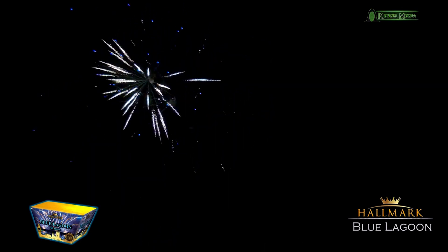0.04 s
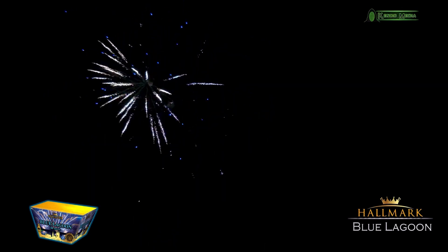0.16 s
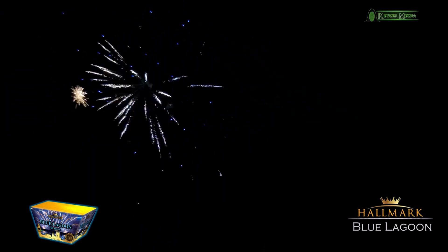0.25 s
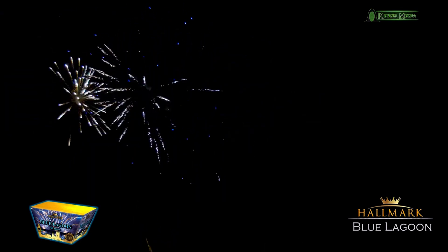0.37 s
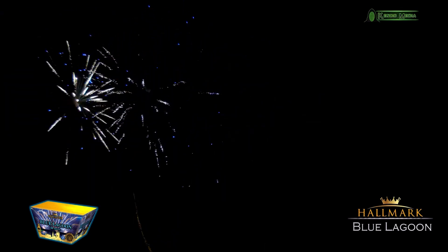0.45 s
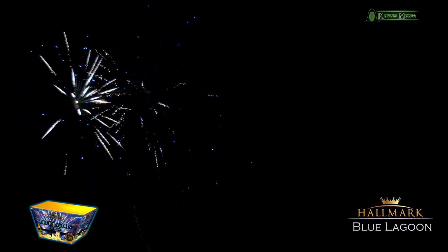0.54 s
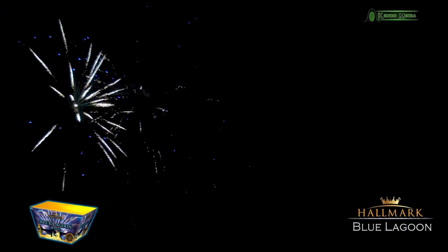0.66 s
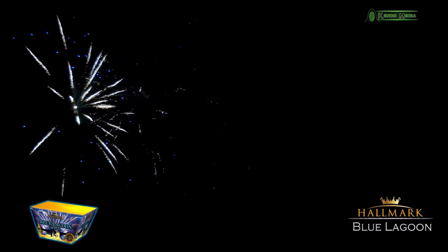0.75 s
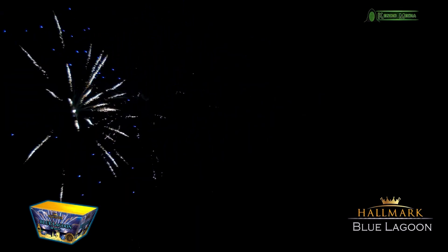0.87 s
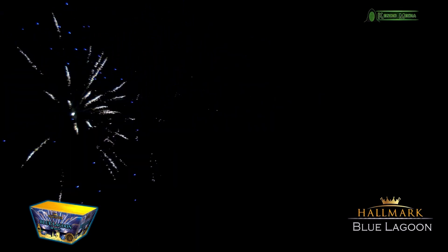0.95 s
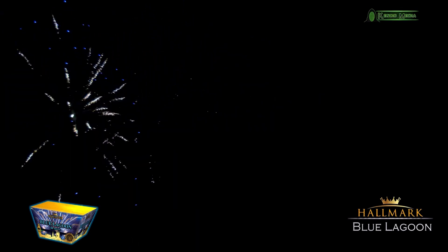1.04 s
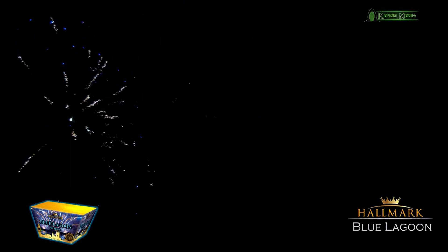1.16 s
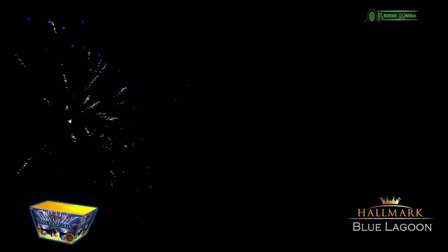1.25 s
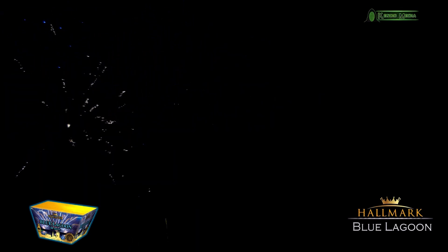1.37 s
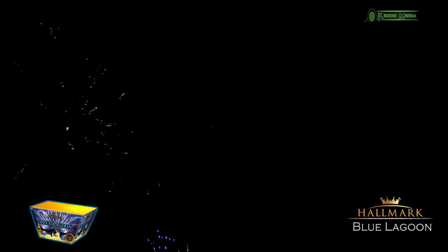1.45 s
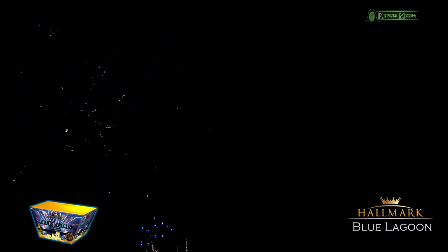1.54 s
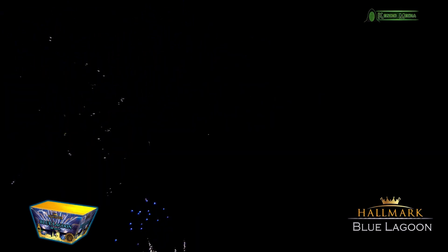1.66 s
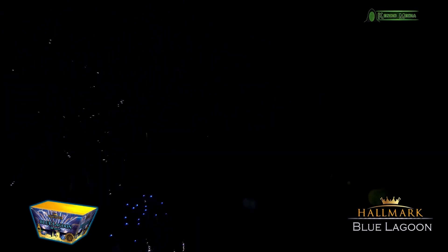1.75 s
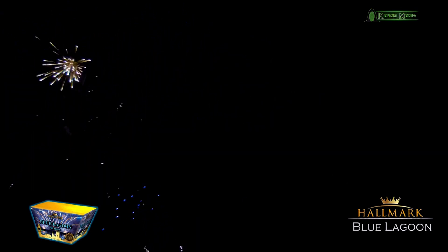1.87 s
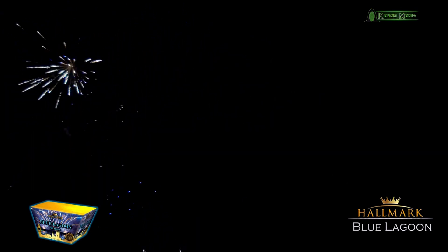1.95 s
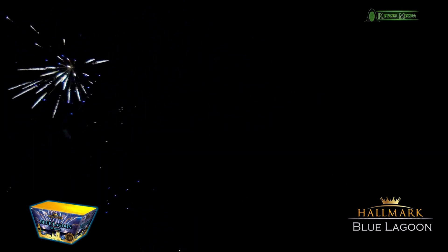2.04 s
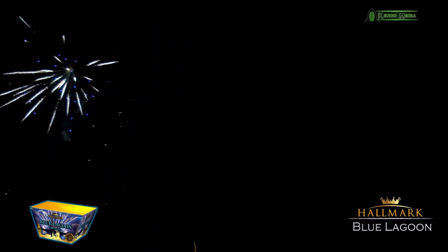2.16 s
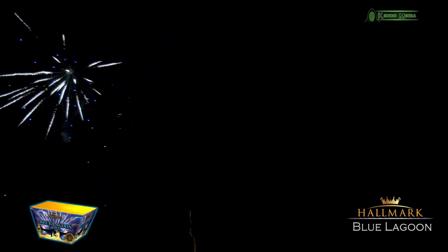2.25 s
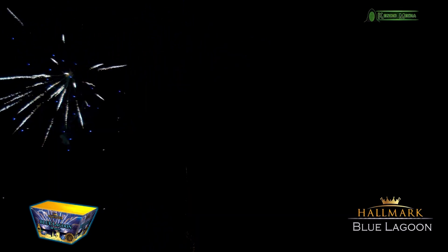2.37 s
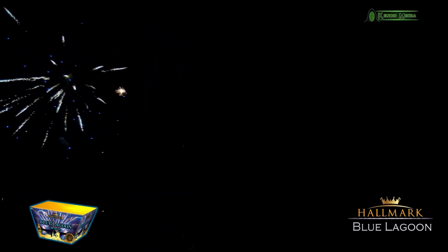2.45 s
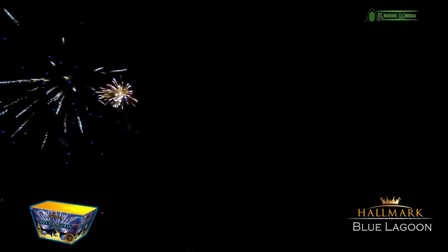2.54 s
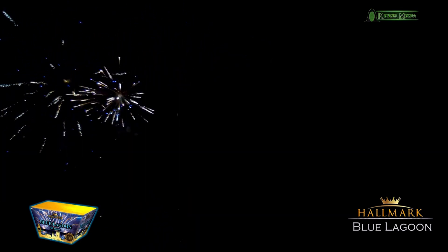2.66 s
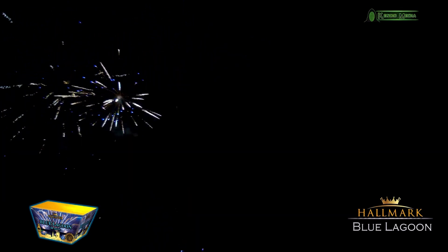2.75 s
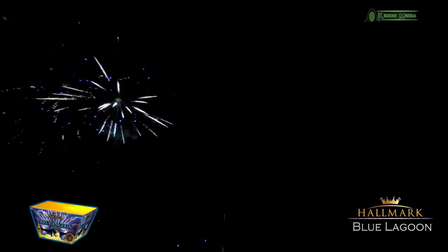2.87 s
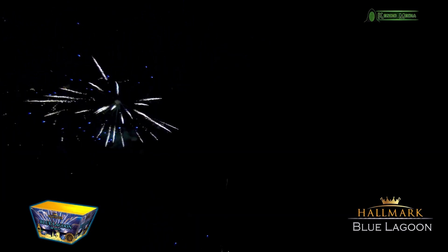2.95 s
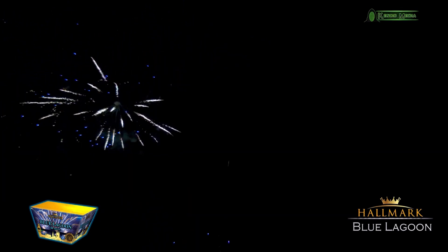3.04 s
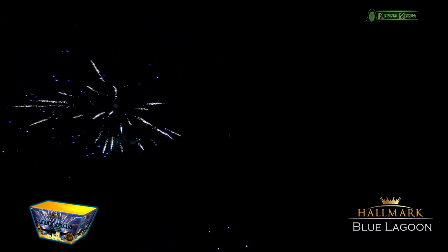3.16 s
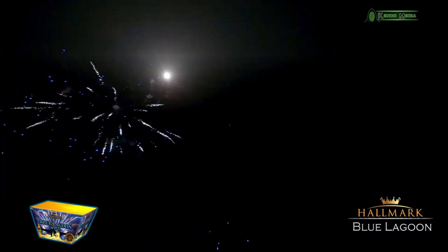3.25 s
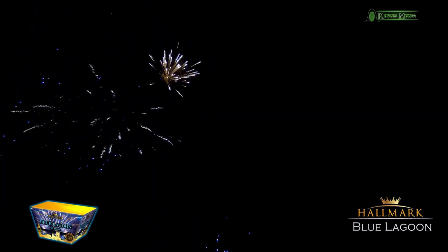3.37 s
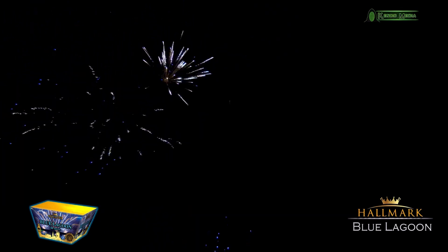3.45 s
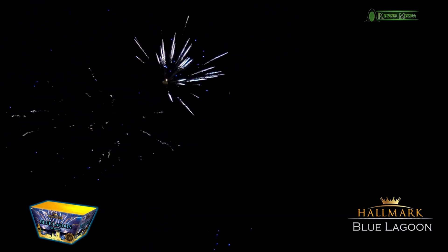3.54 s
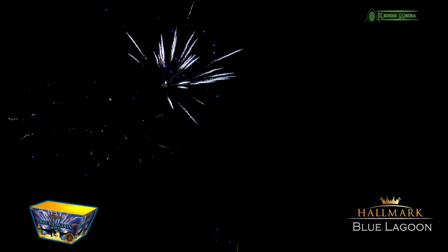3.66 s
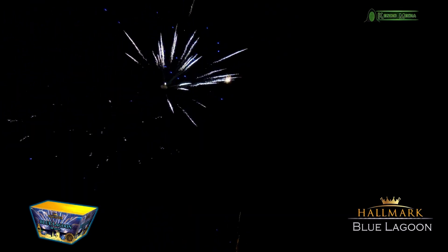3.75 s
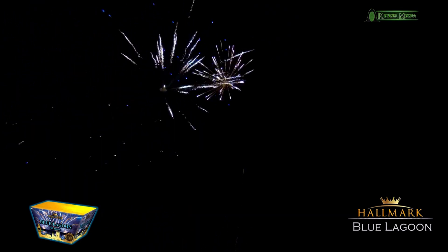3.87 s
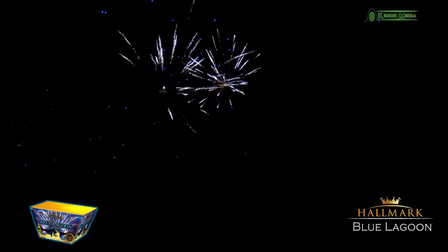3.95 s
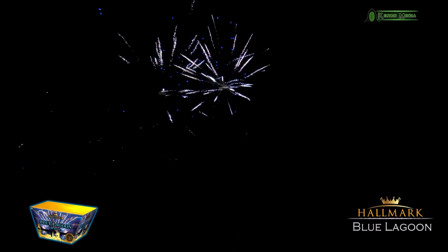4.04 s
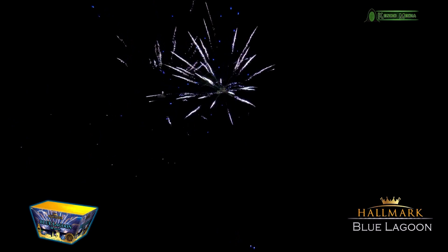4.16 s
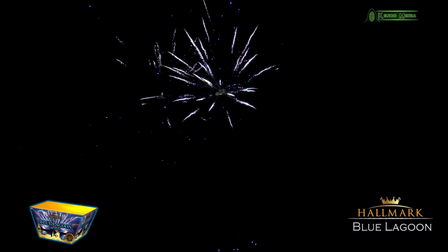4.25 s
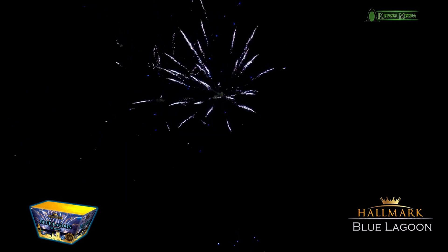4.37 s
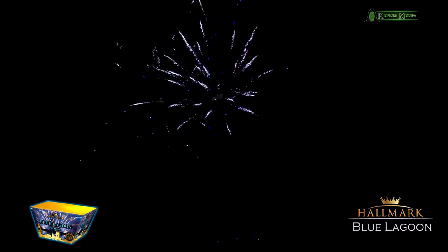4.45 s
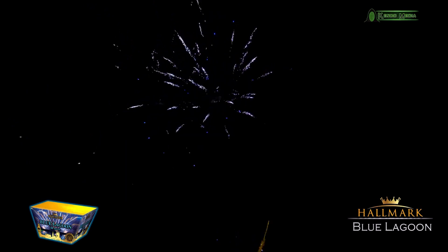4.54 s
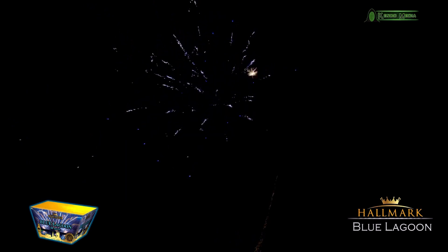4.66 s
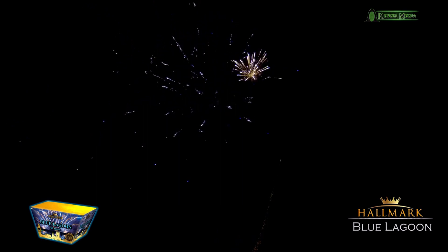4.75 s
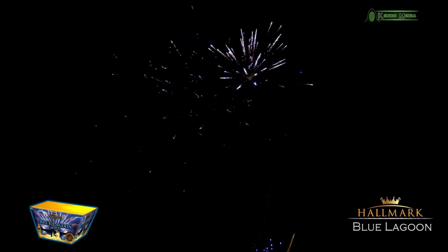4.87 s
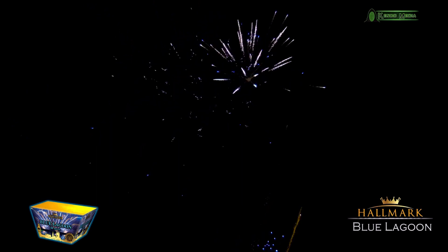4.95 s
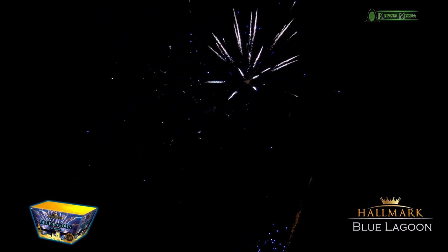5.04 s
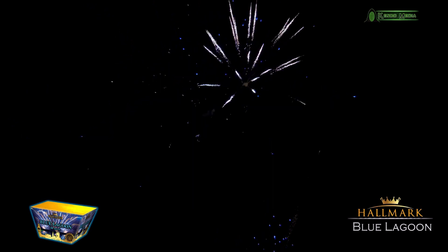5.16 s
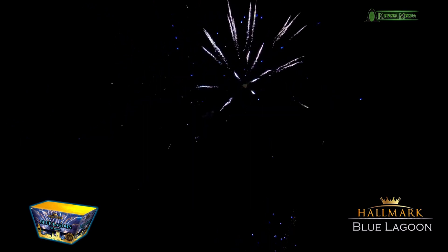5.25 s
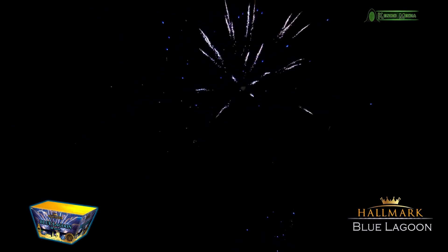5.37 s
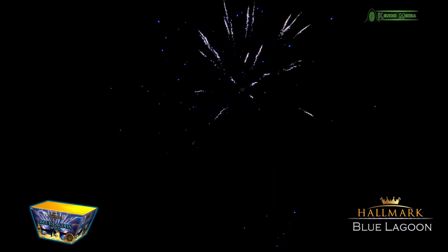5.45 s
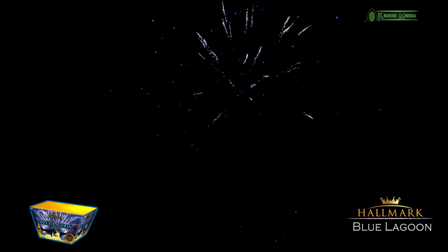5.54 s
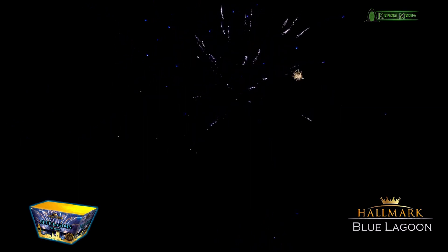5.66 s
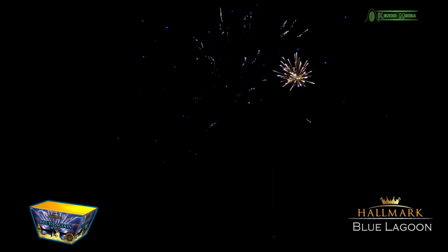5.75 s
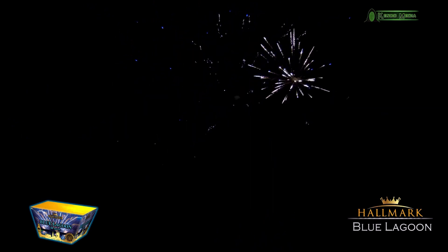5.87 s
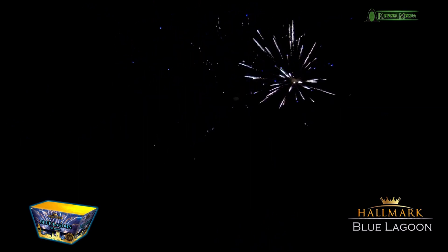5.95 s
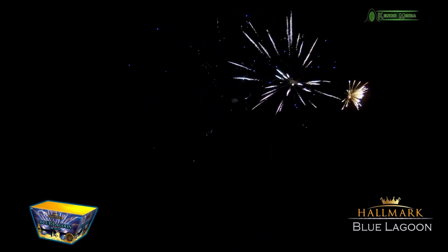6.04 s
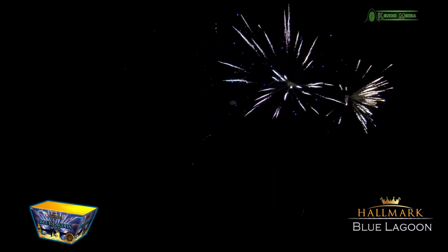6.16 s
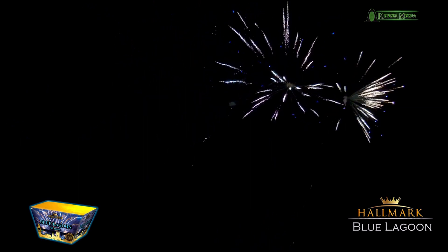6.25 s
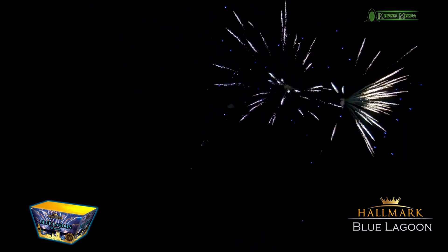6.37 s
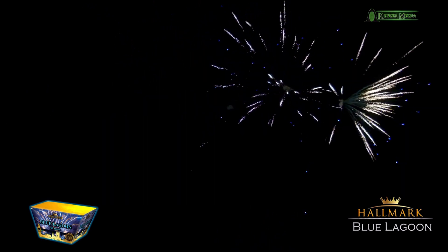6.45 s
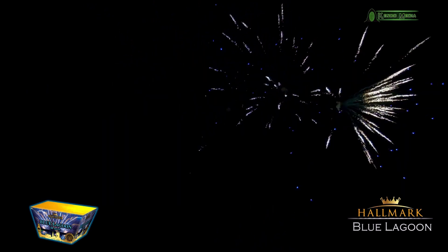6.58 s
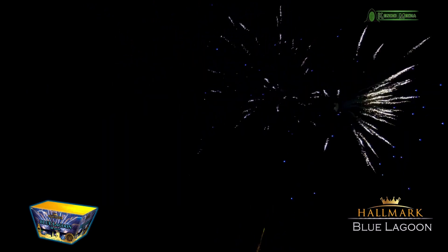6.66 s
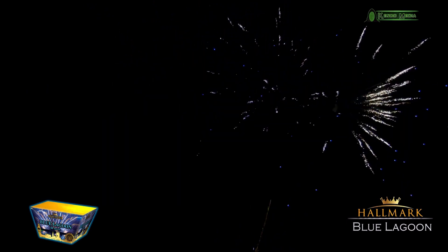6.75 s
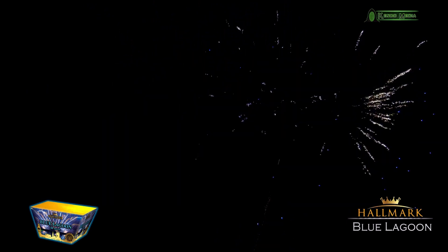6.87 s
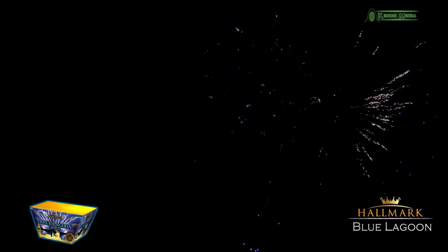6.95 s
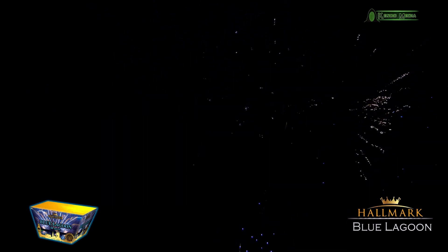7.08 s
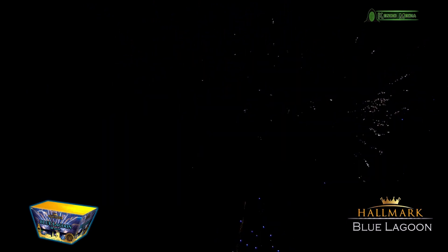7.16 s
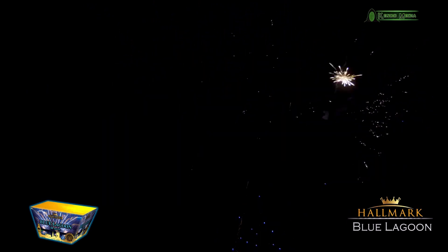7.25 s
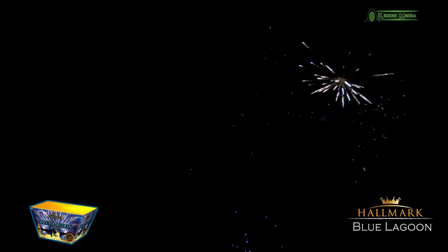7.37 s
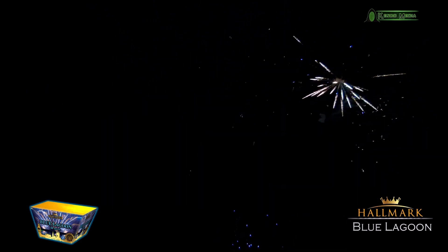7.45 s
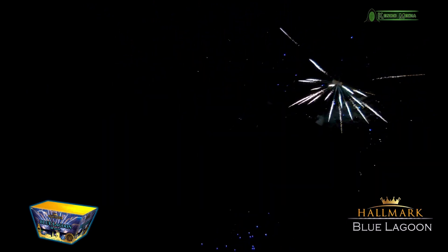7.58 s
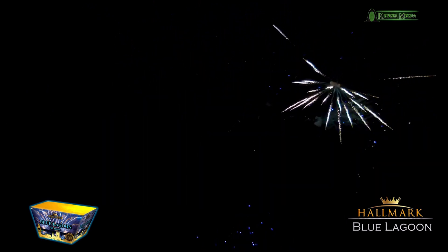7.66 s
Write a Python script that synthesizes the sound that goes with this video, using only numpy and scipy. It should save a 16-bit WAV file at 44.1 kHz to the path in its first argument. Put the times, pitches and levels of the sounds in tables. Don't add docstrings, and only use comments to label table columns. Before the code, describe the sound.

Rows of three firework shells burst in sharp, overloaded cracks outdoors, with dull launch thumps between them, short echoes and faint wind rumble.

```python
import sys
import numpy as np
from scipy import signal
from scipy.fft import rfft, irfft, next_fast_len
from scipy.io import wavfile
from scipy.ndimage import map_coordinates

SR = 44100
rng = np.random.default_rng(int(sys.argv[2]) if len(sys.argv) > 2 else 0)


def unload_wav(signal):
    wavfile.write(
        sys.argv[1],
        SR,
        np.round(np.clip(np.atleast_2d(signal).T, -1, 1) * 32767).astype(np.int16),
    )


def voltage_ratio(level):
    return 10 ** (np.asarray(level, float) / 20)


N = 340011
LEAD = SR // 4


def unit(x):
    return x / np.sqrt(np.mean(x ** 2) + 1e-20)


def add(track, s, sound):
    i = LEAD + round(s * SR)
    track[:, i:i + sound.shape[1]] += sound


def pan(db):
    return voltage_ratio([[db / 2], [-db / 2]])


def wobble(n, rate):
    return map_coordinates(rng.standard_normal(n // 40), [np.arange(n) * rate / SR])


def noise(n, spectrum, alike, lo_hz=0, hi_hz=SR):
    m = next_fast_len(n)
    hz = np.fft.rfftfreq(m, 1 / SR) + 1
    f, db = np.transpose(spectrum)
    gain = voltage_ratio(np.interp(np.log(hz), np.log(f), db))
    gain = gain / (1 + (lo_hz / hz) ** 4) / (1 + (hz / hi_hz) ** 4)
    mid, side = irfft(rfft(rng.standard_normal((2, m))) * gain, m)[:, :n]
    turn = np.arccos(np.clip(alike, -1, 1)) / 2
    return unit(np.cos(turn) * mid + np.sin(turn) * np.array([side, -side]))


def lowpass(x, hz):
    return signal.lfilter(*signal.butter(2, min(hz, 20000) / (SR / 2)), x)


def blast(push_ms, stretch, fade_ms, drive_db, rebound, settle_ms):
    ms = np.arange(SR // 50) / SR * 1000
    swing = np.cos(np.pi / 2 * (ms / push_ms) ** stretch) * np.exp(-ms / fade_ms)
    wave = np.tanh(voltage_ratio(drive_db) * swing)
    after = ms - push_ms * 3 ** (1 / stretch)
    settling = rebound * np.tanh(after / 0.32) * np.exp(-np.abs(after) / settle_ms)
    return np.where(after < 0, wave, settling)


def field(rows, air, alike, middle_db, near_middle_db, top_db, top_loss_db, count):
    t = np.arange(int(.85 * SR)) / SR
    s, db, rise, t60, treble_db = np.transpose(rows)[:, :, None]
    course_db = db - np.where(t < s, 20 * (s - t) / rise, 60 * (t - s) / t60)

    def total(share):
        return np.sqrt(np.sum(voltage_ratio(course_db + share * treble_db) ** 2, axis=0))

    shapes = [total(0),
              total(0.11) * voltage_ratio(middle_db + near_middle_db * np.exp(-t / .012)),
              total(0.84),
              total(0.93) * voltage_ratio(-top_loss_db * t),
              total(0.88) * voltage_ratio(top_db - 2.6 * top_loss_db * t)]
    bands = [(0, 450), (450, 1400), (1400, 4200), (4200, 9500), (9500, SR)]
    stock = []
    for lo_hz, hi_hz in bands:
        lumps = voltage_ratio(0.93 * wobble(3 * SR, 150) + 2.5 * wobble(3 * SR, 55))
        stock.append(lumps * noise(3 * SR, air, alike, lo_hz, hi_hz))
    starts = rng.integers(2 * SR, size=count)
    return [sum(g * b[:, i:i + len(t)] for g, b in zip(shapes, stock)) for i in starts]


def bursts(track):
    # (middle shell [s], left shell late [ms], right shell late [ms], outer shells [dB], echo [dB])
    volleys = [
        (-.108, -12, 11.5, 5.5, 0),
        (0.5282, -12, 12, 0, 0.5),
        (2.1139, -12.5, 11.5, -2.1, -1),
        (2.7975, -9.5, 8.61, 0, -1),
        (3.5768, -5.5, 5, -0.4, -0.5),
        (4.0449, 0, 0.35, -0.5, 0.5),
        (4.981, 2.5, -2.31, -0.5, 0),
        (5.9972, 5.5, -6.5, -0.4, -0.5),
        (6.3047, 10, -10.5, 1.5, -0.5),
        (7.5276, 8.91, -10, -1.17, 0),
    ]
    # (left-right [dB], blast [dB], ground bounce delay [ms], bounce [dB])
    shells = [
        (6, -2, 5.84, -1.4),
        (4, 2.5, 1.81, 5),
        (-5, -2.5, 6.24, -1.6),
    ]
    # (delay [s], level [dB], top [Hz])
    houses = [(.0645, -21.5, 330), (.091, -26.5, 330), (0.141, -37.5, 446), (.185, -45, 495)]
    # (peak [s], bass [dB], rise [s], t60 [s], treble over bass [dB])
    scatterers = [
        (.005, -30, .008, 0.15, -5),
        (.025, -38.5, .03, 0.55, -15.5),
        (.068, -41, .008, 0.32, -2.5),
        (.11, -48, .04, 0.54, -0.45),
        (.19, -49, .1, 0.083, -6.5),
        (.33, -68.5, .15, 1.7, 0.5),
    ]
    # (frequency [Hz], density [dB per Hz])
    echo_air = [(88, -11), (150, -2), (190, -4.5), (280, 3.5), (854, -20), (1530, -12.5), (1900, -17.5),
                (6640, -16.5), (12700, -23), (16000, -34.5)]
    ragged = [(700, -24.5), (2000, -3.0), (5000, -6.5), (16000, -18.0)]  # (Hz, dB per Hz)
    out = np.zeros_like(track)
    answers = iter(field(scatterers, echo_air, .75, middle_db=-3.0, near_middle_db=14.5, top_db=-7.5,
                         top_loss_db=18.5, count=3 * len(volleys)))
    for middle_s, left_ms, right_ms, outer_db, echo_db in volleys:
        for late_ms, outer, shell in zip([left_ms, 0, right_ms], [1, 0, 1], shells):
            side_db, db, bounce_ms, bounce_db = shell
            s, answer = middle_s + late_ms / 1000, next(answers)
            bounce_ms = bounce_ms - .091 * max(late_ms, 0) * (side_db < 0)
            bounce_ms = bounce_ms - .021 * abs(left_ms) * (1 - outer)
            push_ms, fade_ms, settle_ms = (.5, 1.5, 3.5) if outer else (.58, 2.1, .8)
            shock = blast(0.44, 0.86, 1.6, drive_db=9.0, rebound=0.39, settle_ms=2.7)
            shock = voltage_ratio(db + outer * outer_db) * lowpass(shock, 7600)
            bounce = blast(push_ms, 0.8, fade_ms, drive_db=6.5, rebound=0.18, settle_ms=settle_ms)
            bounce = voltage_ratio(bounce_db + outer * outer_db) * lowpass(bounce, 5100)
            for at, sound in (s, shock), (s + bounce_ms / 1000, bounce):
                grit = noise(len(sound), ragged, 0.94)
                grit = voltage_ratio(-18.5) * grit * np.exp(-np.arange(len(sound)) / SR / 0.0016)
                add(out, at, pan(side_db) * (sound + grit))
                add(out, at, voltage_ratio(echo_db - 2.13) * answer)
                for late, wall_db, top_hz in houses:
                    add(out, at + late, voltage_ratio(wall_db + echo_db) * pan(side_db) * lowpass(sound, top_hz))
    return out


def wind():
    # (time [s], buffet level [dB])
    gusts = [(0.0, -49), (0.52, -46), (0.68, -48.5), (1.12, -49.5), (1.33, -46.5), (2.83, -44.5),
             (3.28, -53), (4.02, -51), (4.49, -54), (4.85, -58), (4.98, -47.5), (5.54, -52.5), (6.03, -52),
             (6.16, -48.5), (6.4, -51.5), (7.19, -43), (7.41, -49), (7.71, -47)]
    # (frequency [Hz], density [dB per Hz])
    rumble = [(12, -29.5), (22, -4.5), (45, -0.5), (70, -3.5), (110, -11), (160, -21.5), (230, -36.5),
              (400, -53), (900, -120)]
    # (frequency [Hz], density [dB per Hz])
    night = [(150, -44), (250, -10), (400, -13), (620, -15), (1200, -14.5), (2900, -26), (6000, -26.5),
             (9200, -30.5), (12000, -30.5), (16000, -40)]
    s, db = np.transpose(gusts)
    buffet = unit(voltage_ratio(1.9 * wobble(N, 15) + 1.6 * wobble(N, 30)) * noise(N, rumble, 0.4))
    gust_gain = voltage_ratio(np.interp(np.arange(N) / SR, s, db) + 4.0)
    hush = voltage_ratio(-66 + 1.2 * wobble(N, 6.9)) * noise(N, night, .4)
    return gust_gain * buffet + hush


def lifts(track):
    # (launch [s], thump [dB], crackle [dB], echo [dB])
    launches = [(0.4084, 1, 0, 1), (1.351, -0.5, 0, -0.3), (2.1952, -1.5, -1.7, -4.5),
                (2.8422, 2.1, -2.5, -0.4), (3.695, 1, -3.5, -1.5), (4.501, -1.6, -4.5, -3),
                (4.8624, 1.1, -1, -2), (6.1307, .6, -.6, 2.5), (6.6775, -1, -1.66, -1.5),
                (7.1102, -0.1, -4.5, -2.5)]
    # (thump [dB], its left-right [dB], crackle [dB], its left-right [dB])
    tubes = [
        (2, 1, -14, 1),
        (-7, 7, -8.5, 3),
        (-7, -4.5, -12.5, -4),
    ]
    tube_late_ms = np.array([0, 4.13, 8.3])
    tube_drift = np.array([0, .065, -.07])
    # (delay [s], level [dB], left-right [dB], top [Hz])
    walls = [(.027, -34, 4.5, 506), (.046, -28.5, 1.5, 424), (0.062, -34.5, 0, 9400),
             (.066, -28, -0.5, 420), (0.173, -43.5, 9, 400.4)]
    # (peak [s], bass [dB], rise [s], t60 [s], treble over bass [dB])
    scatterers = [
        (.008, -17.5, 0.00066, .06, -16.5),
        (0.021, -34, .012, 0.25, -7.5),
        (0.066, -40, .008, .2, 7),
        (.17, -49.5, 0.13, 0.39, 1.5),
        (.225, -62.5, .08, .25, 1.5),
        (0.301, -70.5, 0.092, 1.1, -0.5),
    ]
    # (frequency [Hz], density [dB per Hz])
    echo_air = [(88, -4), (150, 2), (264, 1.5), (341, 9.5), (376, 2.5), (1170, -19.5), (3040, -15),
                (4160, -15.5), (6770, -11.5), (16000, -20)]
    gritty = [(900, -42.5), (1700, -3.5), (2800, 0.5), (5000, -7), (7000, -4), (11000, -12.5),
              (16000, -21.5)]
    ms = np.arange(SR // 50) / SR * 1000
    spit_shape = 1.5 * np.exp(-ms / 0.74) + .4 * np.exp(-(ms / 4.2) ** 3) + 0.093 * np.exp(-ms / 6)
    spit_shape = (1 - np.exp(-ms / 0.081)) * spit_shape
    leak = SR // 330
    out = np.zeros_like(track)
    answers = field(scatterers, echo_air, 0.33, middle_db=-9, near_middle_db=-0.1, top_db=-6.5,
                    top_loss_db=27, count=len(launches))
    for (s, thump_db, crackle_db, echo_db), answer in zip(launches, answers):
        row = np.zeros((2, SR // 25))
        row[:, :len(ms)] = 0.16 * pan(1.5) * np.exp(-((ms - 11) / 3.5) ** 2)
        for delay_ms, tube in zip(tube_late_ms + tube_drift * s, tubes):
            tube_db, side_db, spit_db, spit_side_db = tube
            grit = noise(len(ms), gritty, 0.84)
            lumps = voltage_ratio(3.7 * wobble(3 * len(ms), 900)[:len(ms)])
            spit = voltage_ratio(crackle_db + spit_db) * grit * lumps * spit_shape
            thump = blast(1.02, 1.08, 4.8, drive_db=3.5, rebound=0.12, settle_ms=4.2)
            thump = voltage_ratio(thump_db + tube_db) * lowpass(thump, 850)
            start = round(delay_ms * SR / 1000)
            row[:, start:start + len(ms)] += pan(side_db) * thump + pan(spit_side_db) * spit
        add(out, s, row)
        add(out, s - .003, voltage_ratio(crackle_db - 22.5) * grit[:, :leak] * np.linspace(0, 1, leak))
        for late, wall_db, side_db, top_hz in walls:
            add(out, s + late, voltage_ratio(wall_db + echo_db) * pan(side_db) * lowpass(row, top_hz))
        add(out, s, voltage_ratio(echo_db) * answer)
    return out


def far(track):
    # (time [s], peak [dB])
    returns = [(1.2144, -52.5), (1.2355, -47.5), (1.2563, -43), (1.7315, -57.5), (3.2008, -51.5),
               (3.477, -49.5), (3.5003, -45), (5.5967, -56), (5.6194, -50), (5.6437, -46), (5.8694, -56),
               (6.9172, -43)]
    # (frequency [Hz], density [dB per Hz])
    far_air = [(150, -14), (250, -17), (500, -16), (900, 0), (1500, 3.5), (3000, -6), (6000, -38)]
    out, t = np.zeros_like(track), np.arange(SR // 40) / SR
    shape = np.exp(-t / 0.0056) * (1 - np.exp(-t / 0.0011))
    for s, db in returns:
        add(out, s, voltage_ratio(db - 3.5) * noise(len(t), far_air, 0.88) * shape)
    return out


def scene():
    track = np.zeros((2, LEAD + N + SR))
    fireworks = bursts(track) + lifts(track) + far(track)
    return fireworks[:, LEAD:LEAD + N] + wind()


def roll_off(x):
    return signal.sosfilt(signal.butter(12, 16520, fs=SR, output="sos"), x)


def record(dry):
    sensed = signal.lfilter(*signal.butter(2, 27, "high", fs=SR), dry)
    clipped = sensed / (1 + np.abs(sensed / 1.06) ** 12) ** (1 / 12)
    top_cut = signal.cheby2(16, 50, 16500, fs=SR, output="sos")
    narrow = signal.sosfiltfilt(top_cut, clipped)
    return roll_off(np.clip(narrow, -1, 1))


dry = scene()
out = record(dry)
unload_wav(out)
```